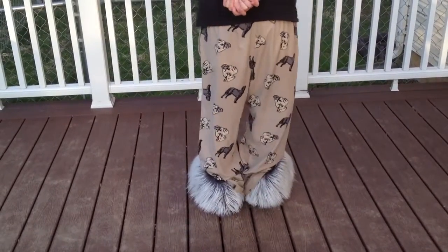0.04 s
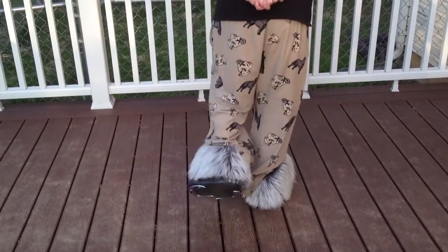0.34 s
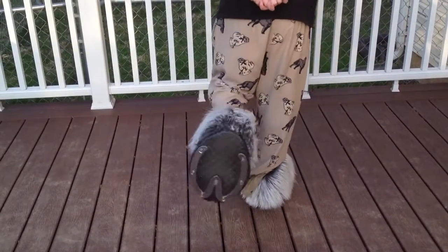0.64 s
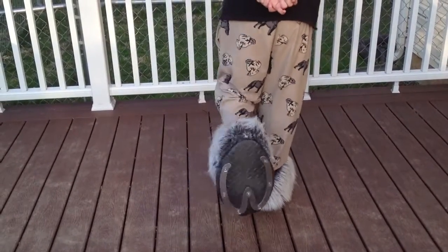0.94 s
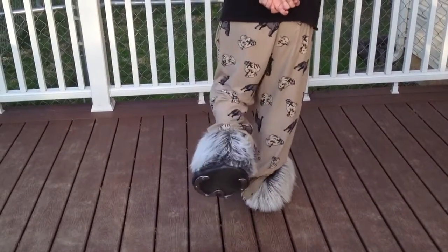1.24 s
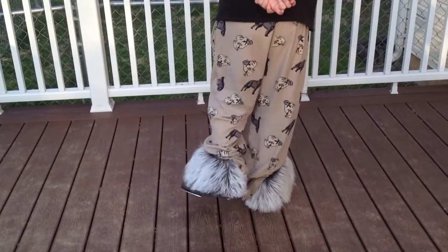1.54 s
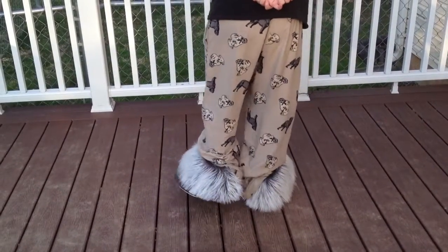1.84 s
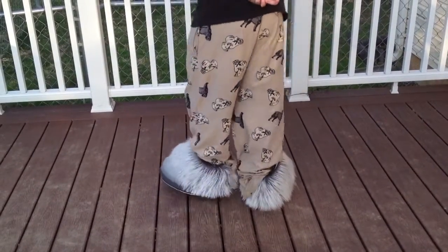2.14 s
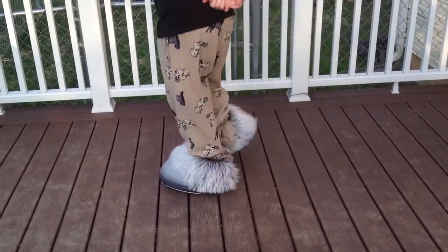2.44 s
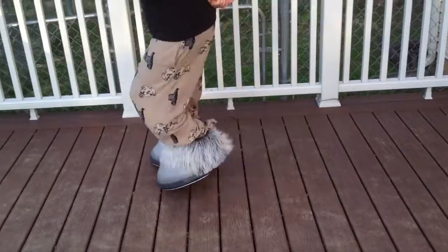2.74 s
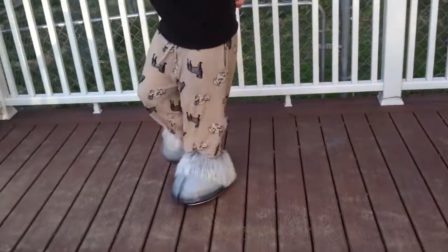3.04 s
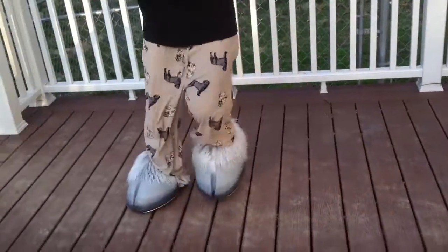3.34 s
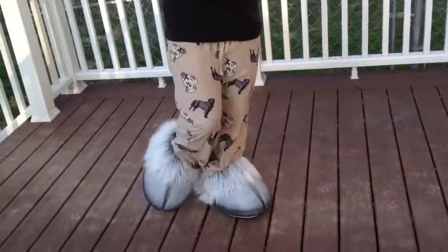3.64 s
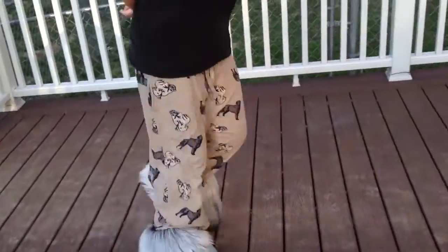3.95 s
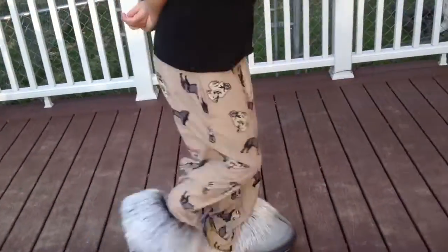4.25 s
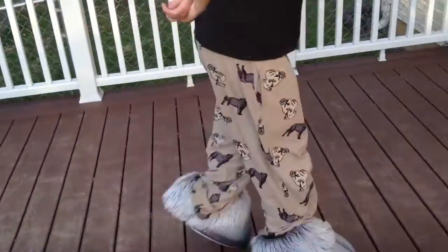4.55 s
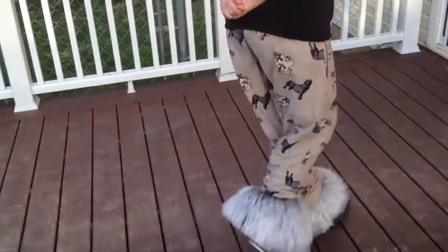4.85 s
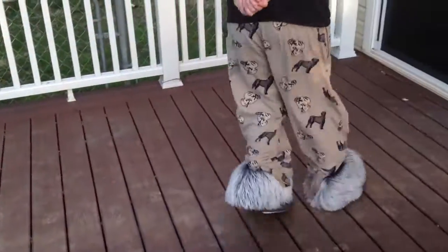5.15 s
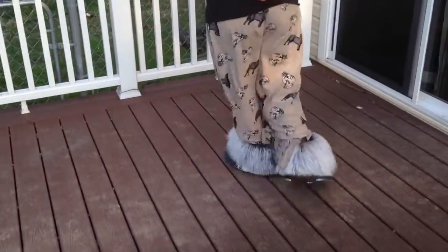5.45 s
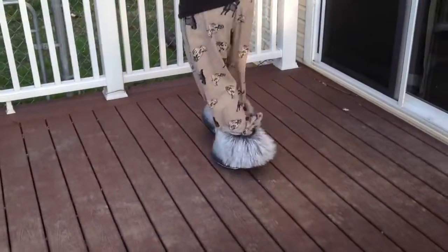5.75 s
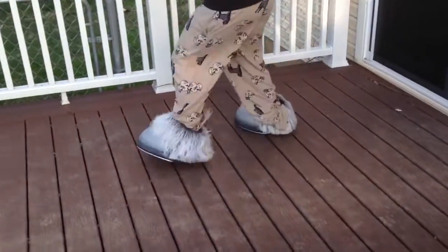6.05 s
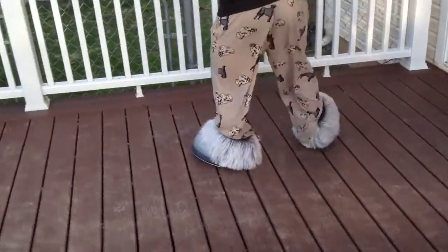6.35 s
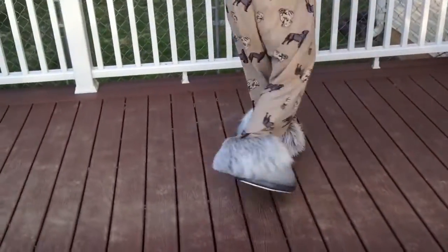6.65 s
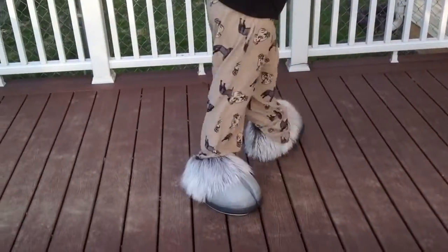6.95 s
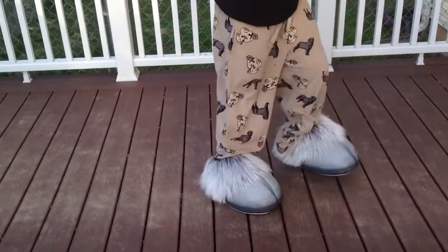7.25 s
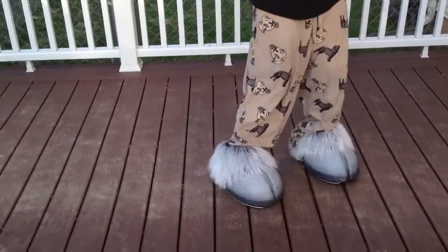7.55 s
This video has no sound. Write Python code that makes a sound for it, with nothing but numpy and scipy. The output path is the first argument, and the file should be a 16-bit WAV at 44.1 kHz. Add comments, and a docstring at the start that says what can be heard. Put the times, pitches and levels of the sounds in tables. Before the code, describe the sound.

Hard-soled hoof shoes clack and knock on a wooden deck outdoors, with light scuffs and faint distant traffic.

```python
"""Wooden deck, outdoors: someone walks in hard-soled hoof shoes, a couple of metres away.
Each shoe touches, rolls flat and rebounds: boards knock, the hollow sole clacks, its hard rim clinks.
Soles scuff and trouser legs brush between steps. Railing and house wall echo.
Behind: distant traffic and a faint bird."""
import sys
import numpy as np
from scipy import signal
from scipy.fft import rfft, irfft
from scipy.io import wavfile

SR = 44100
rng = np.random.default_rng(int(sys.argv[2]) if len(sys.argv) > 2 else 0)


def put_to_file(sound):
    """Save the sound as 16-bit audio at rate SR, in the file named by the first command-line argument."""
    columns = np.atleast_2d(sound).T  # one column per channel
    safe = np.clip(columns, -1, 1)
    whole_steps = np.round(safe * 32767)
    wavfile.write(sys.argv[1], SR, whole_steps.astype(np.int16))


N = 343980

# footfalls: t/s, roll/s, touch clack/dB, touch rim/dB, flat clack/dB, flat rim/dB,
# knock re clack/dB, board f/Hz, sole f/Hz, grind/dB
FOOTFALLS = [(2.2492, .0133, -44, -47, -38, -48, -3, 320, 2900, -58),
             (2.647, .0153, -35, -48, -25, -29, -5.5, 397, 2000, -44),
             (2.9658, 0.027, -27, -42, -26.5, -33, -9, 250, 1650, -51),
             (3.266, .019, -38, -44, -20.5, -22.5, -4, 353, 2050, -47),
             (3.5975, .0195, -24.5, -37.5, -27.5, -30, -11, 350, 2250, -56),
             (3.903, .0135, -32, -33, -26, -22.5, -6, 410, 1950, -51),
             (4.247, 0.0049, -24.5, -25.5, -30.5, -45, -9.5, 310, 2450, -54),
             (4.5686, 0.0075, -26.5, -29, -29, -31, -1, 335, 2650, -47),
             (4.8735, .0273, -25.5, -33, -27, -31.5, -10.5, 380, 1960, -39.5),
             (5.174, .0135, -29, -25.5, -24.5, -30, -7, 267, 2250, -35),
             (5.4889, .0056, -27, -33.5, -24.5, -26, -9, 250, 2150, -38.5),
             (5.8165, 0.024, -43, -40, -23, -30, -4, 325, 2330, -38.5),
             (6.132, .007, -15.5, -24.5, -28, -27, -21, 400, 1850, -46),
             (6.8334, 0.036, -24, -17.5, -28, -46, -1.5, 400, 2100, -50.5),
             (7.4659, .0071, -20.5, -26.5, -23, -31, -9.5, 345, 1950, -57)]
# light taps as the weight shifts, and a strong rebound at 2.97 s: t/s, clack/dB, rim/dB, sole f/Hz
TAPS = [(.168, -57, -58, 2300), (.215, -52.5, -63, 2490), (2.204, -62, -55.5, 2300),
        (2.274, -47, -51, 2300), (2.394, -60, -51.5, 2300), (2.9714, -31, -42, 1970),
        (3.28, -39, -31.5, 2300), (3.975, -44, -50, 2300), (4.5425, -29, -24, 1090),
        (4.734, -55, -54.5, 2300), (4.8283, -53, -47, 2300), (4.887, -26, -36, 2100),
        (4.907, -33, -35, 1810), (5.0614, -53, -52.5, 2300), (5.2251, -36, -44, 2300),
        (5.4304, -32, -43, 1160), (5.7135, -55, -58.5, 2300), (5.88, -35, -60, 2060),
        (6.139, -24, -31, 2755), (6.188, -35, -44, 1590), (6.879, -42, -31, 1890),
        (6.914, -33, -35.5, 2060), (7.0846, -42.5, -66, 1920), (7.1361, -62, -57, 2300),
        (7.4929, -34, -46, 1870), (7.612, -41, -62, 1830)]
# boards bending under load: t/s, start f/Hz, level/dB, t60/s
BOARD_FLEXES = [(2.985, 180, -34, 0.15), (5.496, 185.5, -33.5, 0.34), (6.896, 209, -32.5, 0.15),
                (6.944, 176, -44, 0.36)]
# board modes: f/Hz, level/dB, t60 before extra damping/s
DECK_MODES = [(182, -10, .16), (230.6, -3.5, .11), (259.5, -4.5, 0.079), (300, -0.5, 0.068),
              (350.6, -1, 0.049), (384, -5, 0.057), (431, -1.5, 0.082), (486.4, -3, 0.11),
              (568, -6.5, 0.037), (744, 1.5, 0.021), (911, -4.5, .04)]
# hollow sole, heavily damped: f/Hz, width/Hz, level/dB
SOLE_RESONANCES = [(1135, 600, -1), (1736, 980, 0), (2290, 440, -1.5), (2780, 440, -2.5),
                   (3370, 700, -12.5), (4760, 320, -7.5)]
# hard rim: f/Hz, width/Hz, level/dB
RIM_RESONANCES = [(4200, 1500, -6.5), (5800, 530, -2), (6900, 1100, 1), (8000, 510, 1), (8860, 610, 0.5),
                  (9480, 590, -4.5), (10640, 430, -1.5), (11600, 440, -5.5), (13430, 600, -3),
                  (14800, 800, -12)]
# foot drags and trouser swishes: peak t/s, half length/s, hiss/dB, rub/dB
DRAGS = [(.176, .1, -69, -70), (2.328, .065, -55.5, -55), (2.942, .014, -53.5, -48.5),
         (3.556, 0.046, -57, -51.5), (4.195, .03, -49.5, -55), (4.828, .05, -53.5, -56),
         (5.423, 0.042, -56, -54), (6.116, 0.04, -53.5, -55), (6.245, 0.051, -52.5, -41.5),
         (6.793, 0.063, -50.5, -39), (6.994, .024, -57.5, -49.5), (7.103, .046, -56, -58),
         (7.287, .019, -57.5, -54), (7.65, 0.11, -60, -49)]
# cloth and grit hiss: f/Hz, density/dB
HISS_SPECTRUM = [(1500, -20.5), (3000, -2.5), (5000, -7.5), (7200, 0), (9500, -8), (12000, -9.5),
                 (15500, -12)]
# sole rubbing on boards: f/Hz, density/dB
RUB_SPECTRUM = [(120, -21), (250, 0.5), (400, 3.5), (620, -6), (1100, -7.5), (2100, -3), (3200, -19.5),
                (6000, -39.5)]
# railing and house wall: delay/s, level/dB
WALL_ECHOES = [(.0052, -17), (0.0105, -19.5), (0.0237, -26), (.036, -34.5)]
# distant traffic over faint treble hiss: f/Hz, density/dB
TRAFFIC_SPECTRUM = [(42, -43), (75, -12.5), (125, -3.5), (150, -2), (240, 1.5), (340, -1), (600, -3),
                    (950, -1.5), (1750, -8.5), (2700, -22.5), (4000, -32.5), (7500, -37.5), (10200, -43.5),
                    (13300, -38)]


def steps(flat_pitch_ratio=.89, rebound_s=.0062, rebound_db=-15):
    """Shoes land on an edge, then flat, rebounding each time; plus flex and taps. Rows: spread, beamed."""
    out = np.zeros((2, N))
    for s, roll_s, *levels_db, knock_db, board_hz, sole_hz, _ in FOOTFALLS:
        touch_db, touch_rim_db, flat_db, flat_rim_db = levels_db
        touch = s, touch_db, touch_rim_db, sole_hz
        flat = s + roll_s, flat_db, flat_rim_db, flat_pitch_ratio * sole_hz
        for at_s, db, rim_db, hz in touch, flat:
            add(out, at_s, blow(db, rim_db, knock_db, board_hz, hz))
            rebound = blow(db + rebound_db, rim_db + rebound_db, knock_db, board_hz, hz)
            add(out, at_s + rebound_s, rebound)
    for s, hz, db, t60_s in BOARD_FLEXES:
        add(out[0], s, undb(db) * board_flex(hz, t60_s))
    for s, db, rim_db, sole_hz in TAPS:
        add(out, s, blow(db, rim_db, knock_re_clack_db=-9.5, board_hz=378, sole_hz=sole_hz))
    return out


def blow(clack_db, rim_db, knock_re_clack_db, board_hz, sole_hz):
    """One contact sounds boards, sole and rim. Rows: spread all round, beamed ahead."""
    t = np.arange(8192) / SR
    knock = attack_level(board_knock(t, board_hz), clack_db + knock_re_clack_db)
    sole_noise, cavity_tone = sole_clack(t, clack_db, sole_hz)
    rim_noise, edge_tone = rim_clink(t, rim_db)
    return np.array([knock + sole_noise + rim_noise, cavity_tone + edge_tone])


def board_knock(t, centre_hz, focus_db=10.5, focus_octaves=.31):
    """Decaying board modes; the struck spot favours those near centre_hz."""
    hz, db, t60_s = np.transpose(DECK_MODES)[:, :, None]
    detune, phase, uneven_db = rng.standard_normal((len(DECK_MODES), 3)).T[:, :, None]
    favour_db = focus_db * np.exp(-(np.log2(hz / centre_hz) / focus_octaves) ** 2)
    waves = np.sin(2 * np.pi * (hz * (1 + .037 * detune) * t + phase))
    modes = undb(db + favour_db + uneven_db) * fade(t, t60_s) * waves
    onset = 1 - np.exp(-t / .0008)
    return band(modes.sum(0) * onset * fade(t, .22), 190, 1600)


def sole_clack(t, db, cavity_hz, typical_db=-25.5):
    """Damped sole noise and the tone of air trapped beneath; harder blows sound hollower."""
    tone_share = np.clip(.38 + .033 * (db - typical_db), .14, .85)
    shell = noise(resonances(SOLE_RESONANCES), len(t)) * burst(t, .00067, .052)
    shell *= undb(2.7 * wander(600, len(t)))
    cavity = tone(t, cavity_hz, wobble=.078) * burst(t, .00057, .024)
    return (np.sqrt(1 - tone_share) * attack_level(shell, db),
            np.sqrt(tone_share) * attack_level(cavity, db))


def rim_clink(t, db, typical_db=-29):
    """The rim rings until the weight damps it; harder blows are brighter, higher, more tonal."""
    hard_db = db - typical_db
    tone_share = np.clip(.42 + .05 * hard_db, .2, .85)
    edge_hz = 6850 + 85 * max(hard_db, 0)
    rim = noise(resonances(RIM_RESONANCES), len(t))
    rim = colour(rim, [(7000, .0051), (13000, .41 * hard_db)])
    rim *= burst(t, .0013, .014) + undb(-17.5) * burst(t, .0053, .058)
    rim *= undb(3.5 * wander(900, len(t)))
    edge = tone(t, edge_hz, wobble=.029) * burst(t, .00072, .013)
    return (np.sqrt(1 - tone_share) * attack_level(rim, db),
            np.sqrt(tone_share) * attack_level(edge, db))


def board_flex(start_hz, t60_s):
    """A bending board hums; the pitch sags as the load grows."""
    t = np.arange(SR // 2) / SR
    hz = start_hz * (1 - .078 * (1 - np.exp(-t / .04)))
    return burst(t, .0044, t60_s) * sine(hz)


def scuffs(grind_lag_s=.019, grind_half_s=.0135, grind_rub_db=1.5, size=2 ** 15):
    """Cloth and fur hiss over grit; soles catch on the grain when dragged and just after landing."""
    out = np.zeros(N)
    t = (np.arange(size) - size / 2) / SR
    grinds = [(s + grind_lag_s, grind_half_s, db, db + grind_rub_db) for s, *_, db in FOOTFALLS]
    for s, half_s, hiss_db, rub_db in grinds + DRAGS:
        swell = np.exp(-(t / half_s) ** 2) * undb(2.3 * wander(200, size))
        friction = rng.standard_normal(size) + 1.5 * grit(size)
        hiss = level(colour(friction, HISS_SPECTRUM), hiss_db)
        rub = undb(rub_db) * noise(RUB_SPECTRUM, size)
        scuff = swell * (hiss + rub)
        add(out, s + t[0], scuff[s + t >= 0])
    return out


def grit(size, clicks_per_s=700, spread_db=3.6):
    """Uneven clicks of dirt under a sole; rms 1."""
    hits = rng.random(size) < clicks_per_s / SR
    strength = np.minimum(rng.exponential(size=size), 4)
    return level(hits * undb(spread_db * strength) * rng.choice([-1, 1], size) + 1e-9, 0)


def porch(x, block=8192):
    """Direct sound plus echoes; the walker moves, so each block gets a new response."""
    out = x.copy()
    for i in range(0, N, block):
        add(out, i / SR, signal.fftconvolve(x[i:i + block], porch_response()))
    return out


def porch_response(size=16384):
    """Short baluster scatter, a dull return from the yard, distinct echoes smeared by slats."""
    t = np.arange(size) / SR
    balusters = band(rng.standard_normal(size), 200, 12900, order=1)
    balusters *= (1 - np.exp(-t / .0039)) * fade(t, .15)
    yard = band(rng.standard_normal(size), 200, 6000, order=1) * fade(t, .65)
    response = energy_level(balusters + undb(-20) * yard, -10)
    for delay_s, db in WALL_ECHOES:
        smear = rng.standard_normal(size) * fade(t, .0044)
        add(response, delay_s, energy_level(smear, db))
    return response


def bird(start_s=.14, period_s=.155, count=14, whistle_db=-62.5, size=8192):
    """A far songbird repeats one rising whistle, blurred by trees."""
    out = np.zeros(N)
    t = np.arange(size) / SR - .1  # zero near the top of the note
    glide_hz = np.interp(t, [-.065, -.033, -.008, .008], [2650, 3000, 3440, 3500])
    swell = np.interp(t, [-.075, -.05, -.015, .005, .018], [0, .35, .7, .9, 0])
    for k, detune in enumerate(rng.standard_normal(count)):
        whistle = swell * sine(glide_hz * (1 + .006 * detune))
        add(out, start_s + k * period_s + t[0], undb(whistle_db + 3 * wander(121, size)) * whistle)
    trees = rng.standard_normal(size) * fade(t - t[0], .55)
    return out + signal.fftconvolve(out, energy_level(trees, -2))[:N]


def traffic(wash_db=-45.5):
    """Distant wavering wash; the rumble grows as a drone shifts from its upper note to its lower."""
    wash = undb(wash_db) * noise(TRAFFIC_SPECTRUM, N)
    low = colour(wash, [(130, 8.5), (220, -29)])
    shift_db = np.interp(np.arange(N) / SR, [1.6, 3.5], [-3.5, 1])
    rumble = low * undb(.38 * shift_db + .5 * wander(8.2, N))
    rush = (wash - low) * undb(.7 * wander(4.304, N))
    lower_drone = level(band(rng.standard_normal(N), 141.7, 148.1), -60.5) * undb(shift_db)
    upper_drone = level(band(rng.standard_normal(N), 222, 235.2), -62.5) * undb(-shift_db)
    return rumble + rush + lower_drone + upper_drone


def undb(db):
    return 10 ** (np.asarray(db) / 20)


def level(x, db):
    return x * undb(db) / np.sqrt(np.mean(x ** 2))


def attack_level(x, db):
    """Set the rms of the first 10 ms."""
    return x * undb(db) / np.sqrt(np.mean(x[:SR // 100] ** 2))


def energy_level(x, db):
    return x * undb(db) / np.sqrt(np.sum(x ** 2))


def add(out, at_s, x):
    i = max(int(at_s * SR), 0)
    out[..., i:i + x.shape[-1]] += x[..., :out.shape[-1] - i]


def colour(x, spectrum):
    """Filter by points of f/Hz, gain/dB."""
    hz, db = np.transpose(spectrum)
    bins_hz = np.maximum(np.fft.rfftfreq(len(x), 1 / SR), 1)
    gain_db = np.interp(np.log(bins_hz), np.log(hz), db)
    return irfft(rfft(x) * undb(gain_db), len(x))


def noise(spectrum, size):
    return level(colour(rng.standard_normal(size), spectrum), 0)


def resonances(modes):
    """Spectrum of parallel damped resonances: f/Hz, level/dB."""
    f = np.geomspace(100, 20000, 400)
    power = sum(undb(db) ** 2 / (1 + ((f / hz - hz / f) * hz / width_hz) ** 2) ** 1.4
                for hz, width_hz, db in modes)
    return np.transpose([f, 10 * np.log10(power)])


def band(x, lo_hz, hi_hz, order=2):
    return signal.sosfilt(signal.butter(order, [lo_hz, hi_hz], "band", fs=SR, output="sos"), x)


def fade(t, t60_s):
    return np.exp(-np.log(1000) * t / t60_s)


def burst(t, rise_s, t60_s):
    return (1 - np.exp(-(t / rise_s) ** 2)) * fade(t, t60_s)


def wander(rate_hz, size):
    """Smooth random curve, spread near 1."""
    points = rng.standard_normal(int(size / SR * rate_hz) + 2)
    return np.interp(np.arange(size) / SR * rate_hz, np.arange(len(points)), points)


def sine(hz):
    return np.sin(2 * np.pi * np.cumsum(hz) / SR)


def tone(t, hz, wobble):
    """A resonance whose pitch wobbles with the pressure on the sole."""
    return sine(hz * (1 + wobble * wander(640, len(t))))


def scene():
    """Mono mix; the beamed shoe tones bypass the echoes."""
    spread, beamed = steps()
    return (porch(spread + scuffs()) + beamed + bird() + traffic())[None]


def record(dry, top_hz=15300):
    """Soft peak rounding, then a steep low-pass."""
    lowpass = signal.ellip(10, .2, 70, top_hz, fs=SR, output="sos")
    return signal.sosfilt(lowpass, np.tanh(1.11 * dry) / 1.09)


dry = scene()
out = record(dry)
put_to_file(out)
```